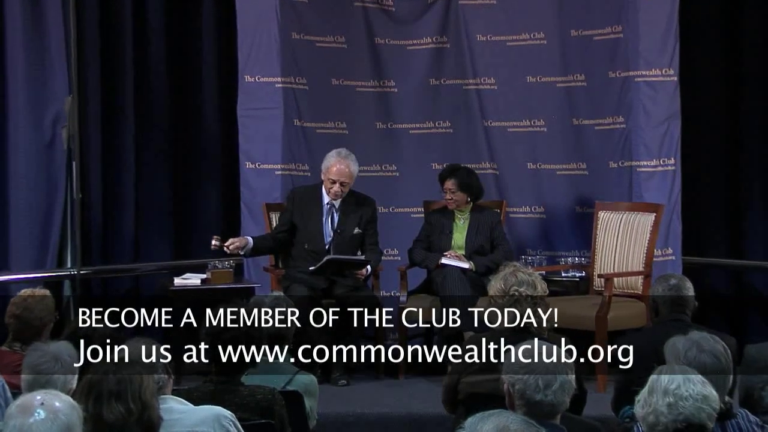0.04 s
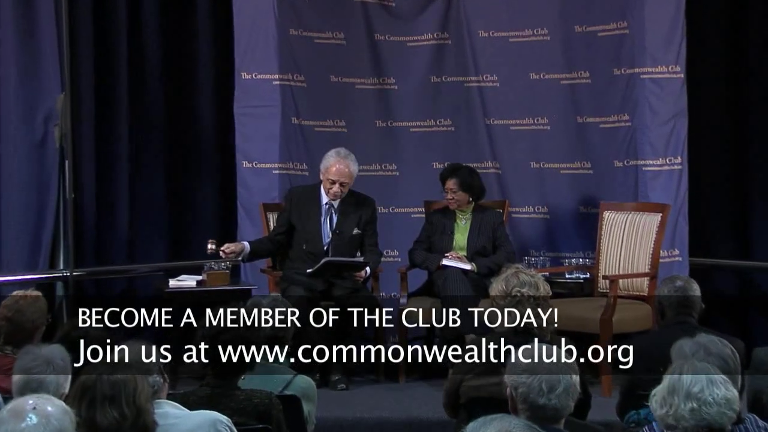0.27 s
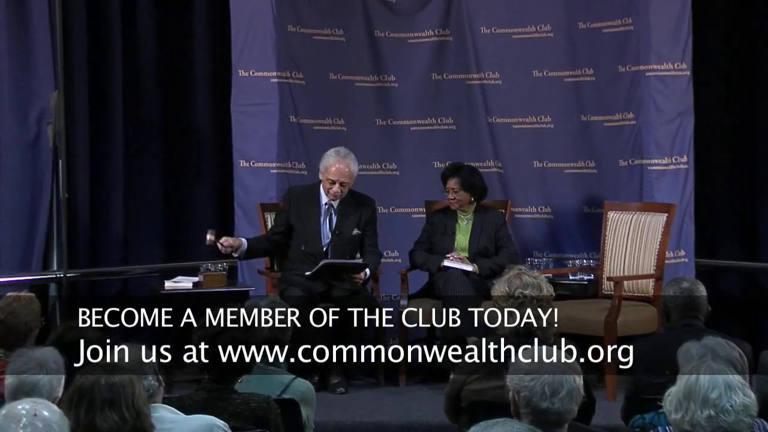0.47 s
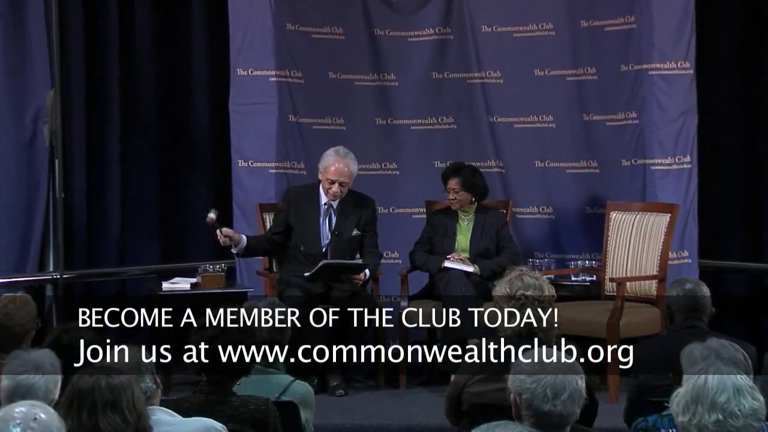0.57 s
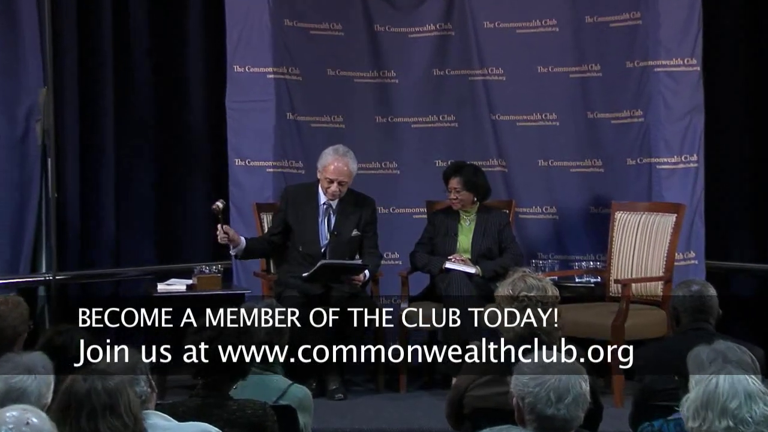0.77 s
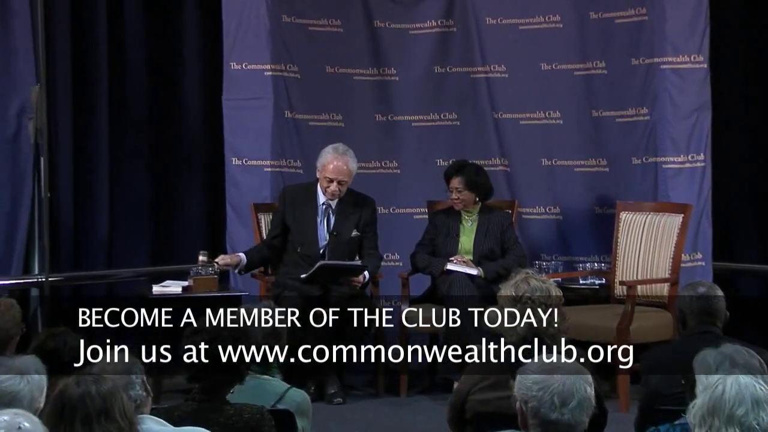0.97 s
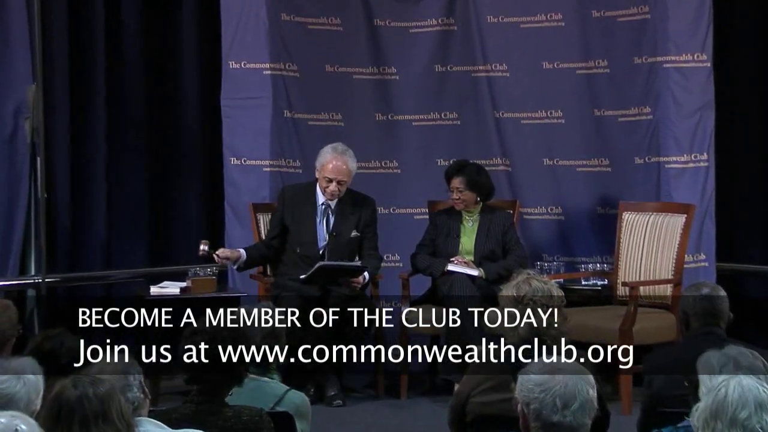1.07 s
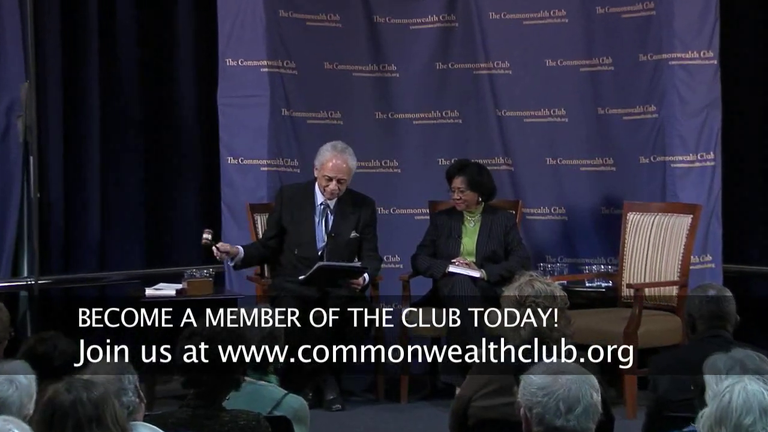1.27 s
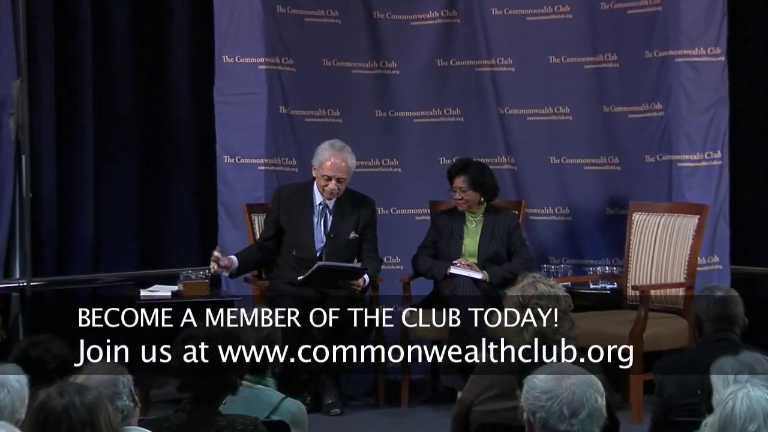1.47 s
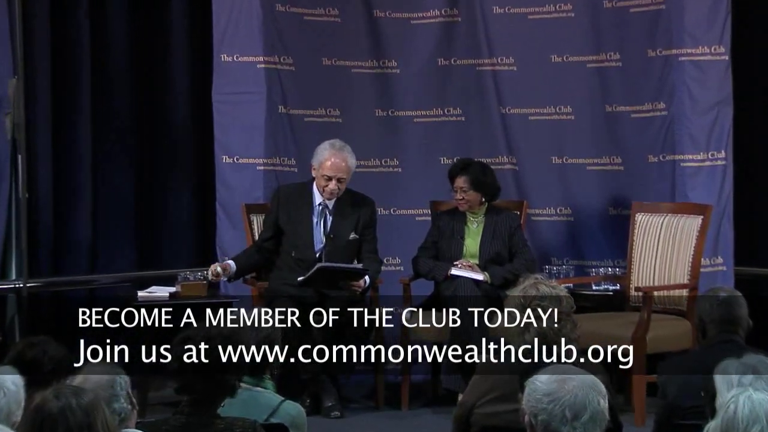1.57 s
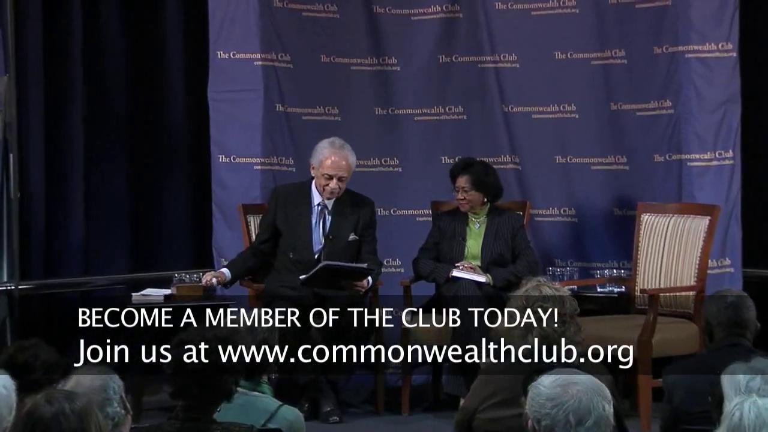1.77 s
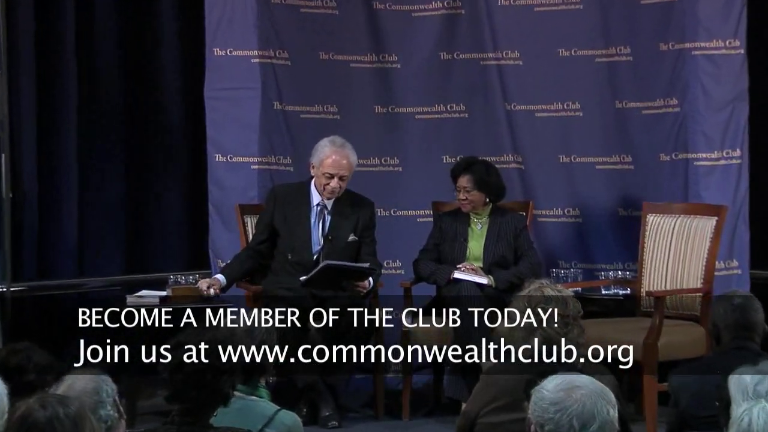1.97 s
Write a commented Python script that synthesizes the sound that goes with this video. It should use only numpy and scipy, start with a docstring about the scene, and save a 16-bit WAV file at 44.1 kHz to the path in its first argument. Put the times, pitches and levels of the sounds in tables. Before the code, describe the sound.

Single sharp, hollow gavel knock with a short hall ring, over faint low ventilation

```python
"""A wooden gavel is rapped once on its block, on the stage of a hall with a quiet audience.
The hollow knock is a click, a burst of noise and short ringing tones; a near surface reflects it.
Brighter copies, probably from the hall's loudspeakers, are filtered, delayed repeats of the knock.
The hall answers with fading noise and lingering tones. Under it lie ventilation, made of coloured noise
and wavering low tones, and faint rustles, made of short bursts of noise."""
import sys
import numpy as np
from scipy import signal
from scipy.fft import rfft, irfft, next_fast_len
from scipy.io import wavfile
from scipy.ndimage import map_coordinates

SR = 44100
rng = np.random.default_rng(int(sys.argv[2]) if len(sys.argv) > 2 else 0)


def bounce(signal):
    """Save signal as a 16-bit WAV file at the path given by the first command-line argument."""
    frames = np.transpose(np.atleast_2d(signal))
    limited = np.clip(frames, -1, 1)
    pcm = np.round(limited * 32767).astype(np.int16)
    wavfile.write(sys.argv[1], SR, pcm)


N = 89478  # length of the scene in samples

# Ringing tones of gavel head and block. Each row: pitch in Hz, level in dB within the knock,
# time to fade by 60 dB in seconds.
WOOD_TONES = [(400, -2.5, 0.023), (590, 3, .036), (730, -5.5, 0.025), (1139, -4.5, 0.011),
              (1294, -6.5, .016), (1600, -3.5, .013), (2260, -5, 0.016), (3050, -14, .018),
              (5150, -19.5, .022), (7120, -21.5, .02)]
# Colour of the contact click and noise. Each row: frequency in Hz, relative level in dB.
CONTACT_COLOUR = [(200, -15), (1000, -3), (1900, 0), (2700, -1), (3500, -6), (4500, -7), (5600, 3),
                  (7000, 0), (8600, -2), (10500, -9)]
# Colour of the near reflection. Each row: frequency in Hz, gain in dB.
NEAR_COLOUR = [(200, -7.5), (600, -0.5), (1050, 6.5), (1500, -6.5), (2200, -11.5), (2900, 1.5), (4500, -15),
               (10000, -12.5)]
# Colour of the loudspeakers. Each row: frequency in Hz, gain in dB before the level of the copy.
SPEAKER_COLOUR = [(150, 3.5), (380, -14), (620, -12), (790, 3), (1050, 10), (1250, 11), (1650, 5),
                  (1900, 1), (2250, -7), (2700, 1), (3600, 3), (4600, 2), (5800, 10.5), (6600, 7),
                  (7600, 0.5), (8900, 7.5), (10500, 1)]
# Repeats as the sound goes round through the microphones. Each row: delay after the knock in seconds,
# gain in dB on top of the loop colour, frequency in Hz above which it is dull.
LOOP_REPEATS = [(.058, 3, 3000), (0.0625, -2, 2500), (.069, -9, 2000), (.095, -8, 2500)]
# Colour of those repeats. Each row: frequency in Hz, gain in dB before the gain of each repeat.
LOOP_COLOUR = [(200, -13.5), (600, -16.5), (800, -16.5), (1000, 1.5), (1220, 5), (1380, -1.5), (1530, 3.5),
               (1750, -8), (2200, -17.5), (10000, -9.5)]
# Colour of the early scatter off the stage. Each row: frequency in Hz, relative level in dB.
SCATTER_COLOUR = [(60, -23), (160, 4.5), (320, 3.5), (600, 5), (770, 9), (900, -8.5), (1250, -4.5),
                  (2000, -13.5), (2900, -8), (3700, -21), (5500, -14.5), (7500, -15.5), (9000, -11),
                  (11000, -21.5)]
# Colour of the hall's tail. Each row: frequency in Hz, relative level in dB.
HALL_COLOUR = [(40, -22.5), (140, -5.5), (230, -3), (300, 1.5), (600, 5), (830, 5), (940, -2), (1020, 2.5),
               (1220, -1.5), (1400, 0.5), (1570, -1.5), (1750, -5.5), (1950, -10), (2900, -15),
               (3400, -16.5), (5600, -15.5), (7600, -17.5), (10500, -21.5)]
# How long the hall's tail lasts. Each row: frequency in Hz, time to fade by 60 dB in seconds.
HALL_FADE = [(100, 0.68), (300, .58), (700, 0.48), (1400, 0.45), (3000, 0.44), (5500, 0.39), (8000, 0.3),
             (11000, .2)]
# What sets the hall ringing. Each row: start in seconds, level in dB, extra treble in dB.
HALL_STARTS = [(1.063, -33.5, 1), (1.087, -29.5, 0)]
# Lingering resonances of the stage and hall. Each row: pitch in Hz, starting level in dB,
# time to fade by 60 dB in seconds.
LINGERING_TONES = [(145.7, -54.5, 1.2), (303, -46, 0.31), (442, -45, .48), (503, -47, 0.28),
                   (660, -45.5, 0.37), (770.4, -32.5, 0.13), (1006, -41.5, 0.35), (1232, -42.5, .26),
                   (1573, -44, .38), (1737, -51.5, .55)]
# Faint rustles. Each row: middle in seconds, length in seconds, level in dB before the fade in and out,
# centre in Hz, width in octaves.
RUSTLE_BURSTS = [(0.035, .06, -79, 1300, 0.47), (0.247, 0.0051, -70, 6500, 0.25),
                 (0.648, 0.047, -70, 260, 0.42), (.8, 0.057, -74.5, 4340, 0.88),
                 (1.696, .014, -80.5, 7500, .1), (1.897, 0.18, -65, 82, 0.18)]
# Colour of the air noise. Each row: frequency in Hz, relative level in dB.
AIR_COLOUR = [(15, -35), (25, -8.5), (48, -25.5), (58, -10), (70, -1), (139, -3.5), (171, -3), (231, -6.5),
              (346, -8), (506, -13.5), (635, -7), (905, -15.5), (1840, -25.5), (6500, -30), (10500, -33),
              (13600, -59), (22000, -120)]
# Slow changes of the air noise. Each row: time in seconds, change of level in dB.
AIR_CHANGES = [(0, 0.7), (.2, -0.5), (.5, -0.5), (.75, -0.7), (1.0, 0), (1.45, 1.5), (1.7, -0.5),
               (2.03, 0.4)]
# Ventilation tones. Each row: pitch in Hz, middle level in dB.
VENT_TONES = [(79, -77), (120, -77), (174, -78)]

RAP_S, RAP_DB = 1.0578, -16.5  # time of the blow, level of the whole knock
ATTACK_S = 0.00053  # rise time of the wood, the contact noise and the scatter
CRACK_DB, CRACK_T60_S = -18, 0.022  # contact noise: level within the knock, time to fade by 60 dB
CRACK_LEAD_S = 0.0015  # contact noise starts this long before the wood swings
SCUFF_DB, SCUFF_SPREAD_S = -27, 0.0021  # faint hiss as the faces meet, level within the knock
CLICK_DB = 12  # sharp pulse of contact, level within the knock
LOW_CUT_HZ = 190
NEAR_DELAY_S = 0.0076
SPEAKER_DELAY_S, SPEAKER_DB = 0.0261, 0.5  # the loudspeakers' first copy
SECOND_DELAY_S, SECOND_DB, SECOND_DULL_HZ = 0.0018, -2, 4000  # farther loudspeaker, against the first
SCATTER_S, SCATTER_DB, SCATTER_T60_S = 1.0885, -23, 0.069  # start, level, time to fade by 60 dB
HALL_RISE_S, TREBLE_HZ = 0.003, 2000  # half of the extra treble is reached at TREBLE_HZ
AIR_DB = -66.5  # middle level of the air noise
TOP_HZ = 10450  # upper limit of the recorder


def amp(db):
    """Turn decibels into a gain."""
    return 10 ** (np.asarray(db) / 20)


def unit(x):
    """Scale a sound to an average (rms) strength of 1."""
    return x / np.sqrt(np.mean(x ** 2) + 1e-20)


def along(points, hz):
    """Read a value between (Hz, value) points, spaced by the logarithm of frequency."""
    f, v = np.transpose(points)
    return np.interp(np.log(hz + 1), np.log(f + 1), v)


def since(s):
    """Count the seconds since time s, staying at zero before it."""
    return np.maximum(np.arange(N) / SR - s, 0)


def rise(t, rise_s):
    """Climb smoothly from 0 towards 1."""
    return 1 - np.exp(-t / rise_s)


def wobble(rate):
    """Draw a smooth random curve through `rate` random points a second."""
    points = rng.standard_normal(int(N * rate / SR) + 4)
    return map_coordinates(points, [np.arange(N) * rate / SR])


def filtered(x, response):
    """Change each frequency of a sound by a response, which may be complex."""
    m = next_fast_len(N + SR // 2)
    return irfft(rfft(x, m) * response(np.fft.rfftfreq(m, 1 / SR)), m)[:N]


def coloured(x, points, size=4096):
    """Filter with the gain of the (Hz, dB) points, without sounding ahead of the input."""
    gain = amp(along(points, np.fft.rfftfreq(size, 1 / SR)))
    cepstrum = irfft(np.log(gain))
    # folding the second half onto the first gives minimum phase
    cepstrum[1:size // 2] *= 2
    cepstrum[size // 2 + 1:] = 0
    impulse = irfft(np.exp(rfft(cepstrum)))
    return signal.fftconvolve(x, impulse)[:N]


def noise(colour):
    """Make random noise of rms 1 with the given colour."""
    return unit(filtered(rng.standard_normal(N), lambda hz: amp(along(colour, hz))))


def delayed(x, delay_s):
    """Shift a sound later by whole samples."""
    return np.roll(x, round(delay_s * SR))


def echo(x, delay_s, db, dull_hz):
    """Make a later, duller copy."""
    return amp(db) * filtered(
        x, lambda hz: np.exp(-2j * np.pi * hz * delay_s) / np.hypot(1, (hz / dull_hz) ** 2))


def gavel():
    """The faces meet with a brief scuff and a click, and the wood rings in short fading tones."""
    t = since(RAP_S)
    ring = sum(amp(db - 60 * t / t60) * np.sin(2 * np.pi * hz * t) for hz, db, t60 in WOOD_TONES)
    ring = ring * rise(t, ATTACK_S)

    contact_s = RAP_S - CRACK_LEAD_S
    u = since(contact_s)
    crack = amp(CRACK_DB - 60 * u / CRACK_T60_S) * rise(u, ATTACK_S)
    # the scuff swells and fades evenly on both sides of first contact
    scuff = amp(SCUFF_DB) * np.exp(-((since(0) - contact_s) / SCUFF_SPREAD_S) ** 2)
    contact = noise(CONTACT_COLOUR) * (crack + scuff)

    pulse = signal.unit_impulse(N, round(RAP_S * SR))
    click = amp(CLICK_DB) * coloured(pulse, CONTACT_COLOUR)
    knock = amp(RAP_DB) * (ring + click + contact)
    low_cut = signal.butter(2, LOW_CUT_HZ, 'high', fs=SR, output='sos')
    return signal.sosfilt(low_cut, knock)


def near_reflection(knock):
    """A near surface sends the knock back a little later with its own colour."""
    return delayed(coloured(knock, NEAR_COLOUR), NEAR_DELAY_S)


def loudspeakers(knock):
    """Two loudspeakers repeat the knock, thin and bright; it comes round again in a narrower range."""
    first = amp(SPEAKER_DB) * delayed(coloured(knock, SPEAKER_COLOUR), SPEAKER_DELAY_S)
    second = echo(first, SECOND_DELAY_S, SECOND_DB, SECOND_DULL_HZ)
    loop = coloured(knock, LOOP_COLOUR)
    repeats = sum(echo(loop, delay_s, db, dull_hz) for delay_s, db, dull_hz in LOOP_REPEATS)
    return first + second + repeats


def stage_scatter():
    """Many early reflections off the stage blur into a short burst of fading noise."""
    t = since(SCATTER_S)
    fade = amp(SCATTER_DB - 60 * t / SCATTER_T60_S)
    return noise(SCATTER_COLOUR) * fade * rise(t, ATTACK_S)


def hall_tail():
    """Reflections too dense to tell apart fade as noise, and the treble dies first."""
    out = np.zeros(N)
    for start, db, treble_db in HALL_STARTS:
        # split the noise into short frames so each frequency can fade at its own speed
        hz, t, frames = signal.stft(noise(HALL_COLOUR), SR, nperseg=512)
        tilt = treble_db * hz ** 2 / (hz ** 2 + TREBLE_HZ ** 2)
        drop = 60 * np.maximum(t - start, 0) / along(HALL_FADE, hz)[:, None]
        fade = amp(db + tilt[:, None] - drop)
        tail = signal.istft(frames * fade, SR)[1][:N]
        out = out + tail * rise(since(start), HALL_RISE_S)
    return out


def resonances(drift=0.4):
    """A few tones of the stage and hall linger, their phase drifting by about `drift` radians."""
    t = since(SCATTER_S)
    tones = sum(amp(db - 60 * t / t60) * np.sin(2 * np.pi * hz * t + drift * wobble(30))
                for hz, db, t60 in LINGERING_TONES)
    return tones * rise(t, HALL_RISE_S)


def rustles():
    """Faint ticks, brushes and low bumps, probably people shifting, are short bursts of noise."""
    out, t = np.zeros(N), since(0)
    for middle, length, db, centre_hz, width in RUSTLE_BURSTS:
        band = filtered(rng.standard_normal(N),
                        lambda hz: np.exp(-0.5 * (np.log2((hz + 1) / centre_hz) / width) ** 2))
        swell = np.exp(-(2 * (t - middle) / length) ** 2)
        out = out + amp(db) * unit(band) * swell
    return out


def ventilation(hum_sway_db=3, drift=0.96):
    """Moving air makes nearly steady noise, with a few low tones wavering in level and phase."""
    t = since(0)
    hum = sum(amp(db + hum_sway_db * wobble(7.6)) * np.sin(2 * np.pi * hz * t + drift * wobble(9))
              for hz, db in VENT_TONES)
    air_db = AIR_DB + np.interp(t, *np.transpose(AIR_CHANGES))
    return amp(air_db) * noise(AIR_COLOUR) + hum


def scene():
    """The knock arrives by all its paths, over the quiet hall."""
    knock = gavel()
    rap = knock + near_reflection(knock) + loudspeakers(knock)
    room = stage_scatter() + hall_tail() + resonances()
    return (rap + room + rustles() + ventilation())[None]


def record(dry):
    """The recorder cuts off steeply above its upper limit."""
    return filtered(dry[0], lambda hz: 1 / np.hypot(1, (hz / TOP_HZ) ** 60))[None]


dry = scene()
out = record(dry)
bounce(out)
```